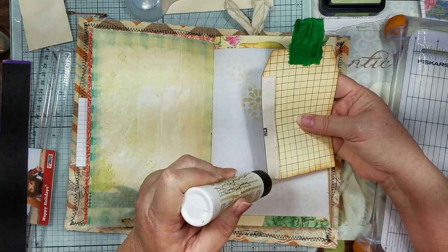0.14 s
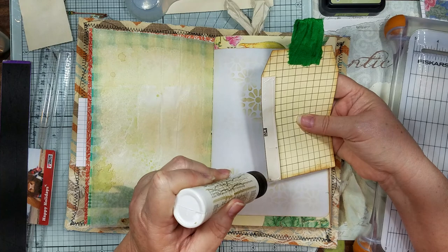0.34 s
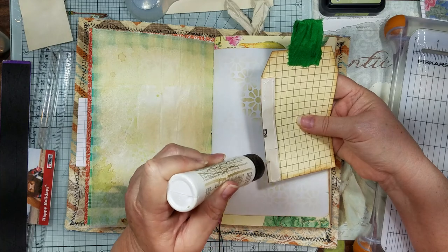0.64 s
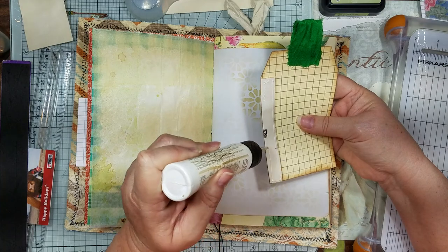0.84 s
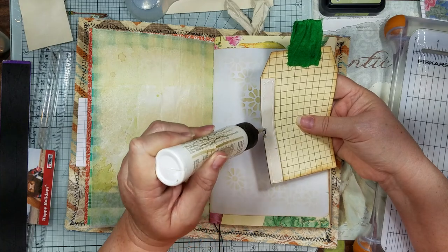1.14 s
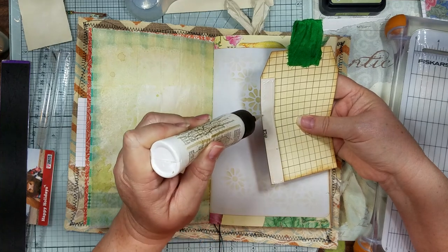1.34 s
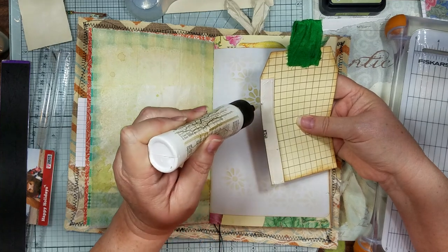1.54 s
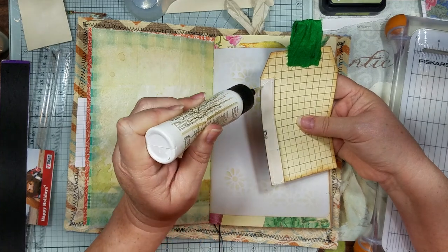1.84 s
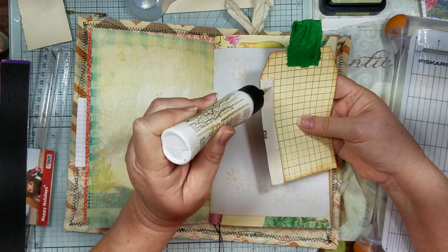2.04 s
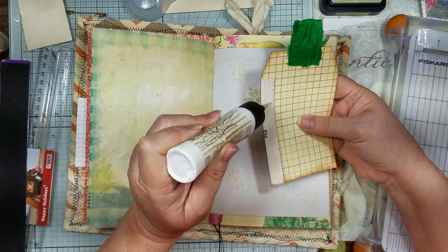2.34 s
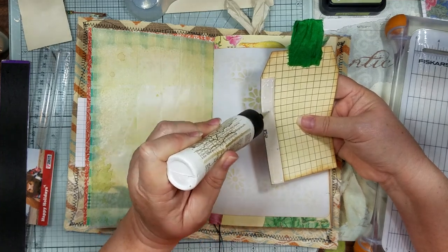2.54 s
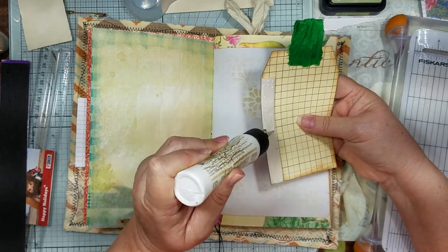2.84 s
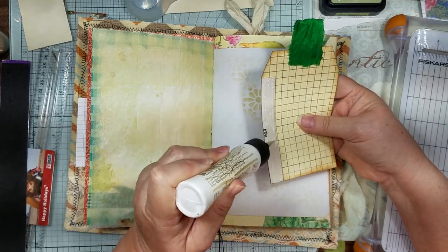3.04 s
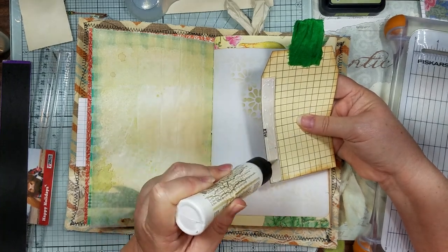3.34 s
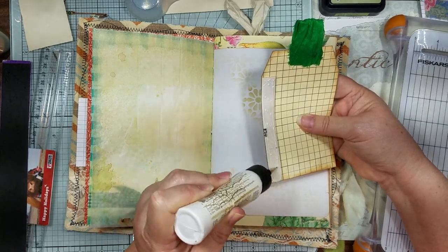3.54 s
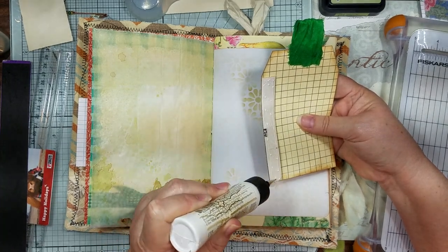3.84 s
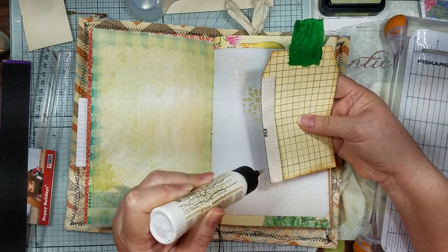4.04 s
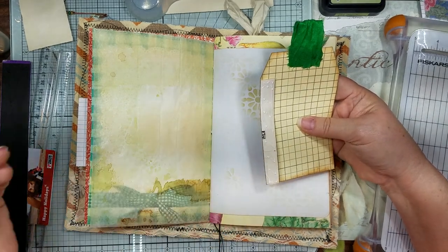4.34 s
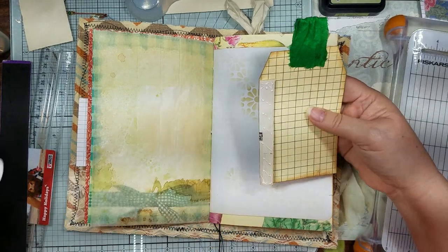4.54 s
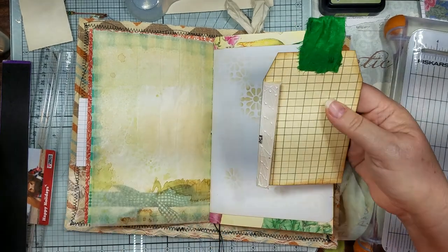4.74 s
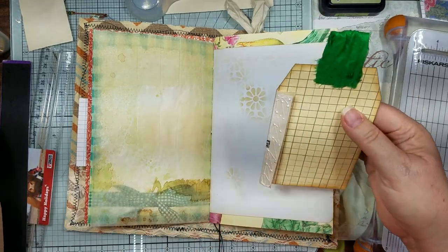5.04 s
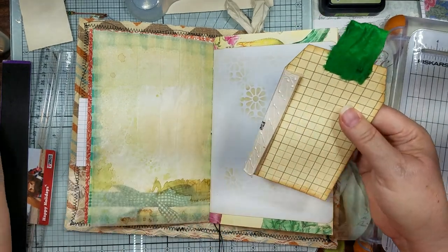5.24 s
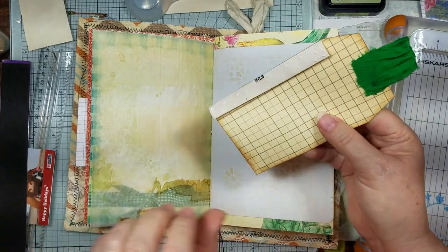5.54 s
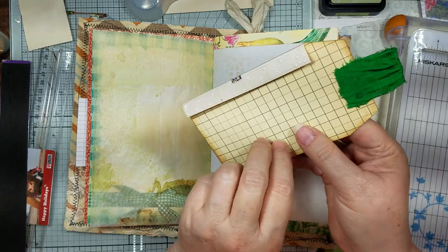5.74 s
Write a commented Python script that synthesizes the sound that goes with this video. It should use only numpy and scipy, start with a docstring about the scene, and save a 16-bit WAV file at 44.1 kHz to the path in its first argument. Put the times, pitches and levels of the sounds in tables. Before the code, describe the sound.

A low, slightly wavering room drone runs throughout. After a soft paper rustle and a nearly inaudible skim, a glue nozzle ticks grainily along a tag's edge for two seconds, slightly right of centre. Then comes louder handling: bottle set down on the table, soft book bump, crisp card snap, dry sliding and small nail clicks. Close pair of microphones, short room tail.

```python
"""A fan hums in a small room: coloured noise, narrow room resonances, wavering sine lines and a brief swell.
The card whispers and is brushed, then a glue bottle's nozzle skims a paper tag and dabs down its edge:
bands of grainy noise. Skin and card rub and slide, a fingernail ticks, the bottle lands and a hand bumps
the book (decaying modes), and the stiff tag snaps on the page (a spike and crackle through resonances).
Two closely spaced microphones hear it all, with a short diffuse room tail and their own faint noise."""
import sys
import numpy as np
from scipy import signal
from scipy.fft import rfft, irfft, next_fast_len
from scipy.io import wavfile
from scipy.ndimage import uniform_filter1d, map_coordinates

SR = 44100
rng = np.random.default_rng(int(sys.argv[2]) if len(sys.argv) > 2 else 0)


def digitize_waveform(pressure):
    """Quantize a signal to 16-bit integers and store it at the path in sys.argv[1].

    Rows of a 2-D input are taken as channels; values are limited to [-1, 1].
    """
    field = np.atleast_2d(pressure).T
    bounded = np.clip(field, -1, 1)
    quanta = np.round(bounded * 32767).astype(np.int16)
    wavfile.write(sys.argv[1], SR, quanta)


N = 260013
TIME = np.arange(N) / SR


def amp(db):
    """Decibels to gain."""
    return 10 ** (np.asarray(db) / 20)


def unit(x):
    """Scale to rms 1."""
    return x / np.sqrt(np.mean(x ** 2) + 1e-20)


def along(points, hz):
    """Read (Hz, value) points on a log frequency axis."""
    f, v = np.transpose(points)
    return np.interp(np.log(hz + 1), np.log(f + 1), v)


def fade(t, t60):
    """Exponential decay that starts at t = 0 and falls 60 dB in t60 seconds."""
    return (t >= 0) * np.exp(-np.log(1000) * np.abs(t) / t60)


def wobble(rate):
    """A smooth random curve, rate knots a second."""
    knots = rng.standard_normal(int(N * rate / SR) + 4)
    return map_coordinates(knots, [TIME * rate])


def filtered(x, response):
    """Filter x by a complex response of frequency."""
    m = next_fast_len(N + SR // 2)
    return irfft(rfft(x, m) * response(np.fft.rfftfreq(m, 1 / SR)), m)[..., :N]


def coloured(x, spectrum):
    """x shaped by a (Hz, dB) spectrum, at rms 1."""
    return unit(filtered(x, lambda hz: amp(along(spectrum, hz))))


def resonance(f, hz, width):
    """Response of one damped resonance, with gain 1 at its peak."""
    return 1j * f * width / (hz * hz - f * f + 1j * f * width)


def placed(x, lead_ms, right_db):
    """A source off to the right reaches that microphone sooner and louder."""
    side = np.array([[-.5], [.5]])
    advance = lambda hz: np.exp(2j * np.pi * hz * side * lead_ms / 10 ** 3)
    return amp(side * right_db) * filtered(x, advance)


def diffuse(x):
    """Sound from all around is alike at both microphones in the bass and unrelated in the treble."""
    spacing_m, sound_speed = 0.18, 343  # m, m/s
    alike = lambda hz: np.sinc(2 * hz * spacing_m / sound_speed)
    split = lambda hz: np.sqrt(np.array([1 + alike(hz), 1 - alike(hz)]) / 2)
    mid, side = filtered(x, split)
    return np.array([mid + side, mid - side])


def room(x):
    """The small room's tail, which dies fastest in the treble."""
    # decay of the room: (f/Hz, t60/s)
    room_decay = [(150, 0.2), (1000, 0.12), (5000, 0.11), (14000, 0.052)]
    hz, t, z = signal.stft(rng.standard_normal((2, SR // 2)), SR, nperseg=256)
    decaying = z * fade(t, along(room_decay, hz)[:, None])
    tail = signal.istft(decaying, SR, nperseg=256)[1]
    tail = np.pad(tail, ((0, 0), (SR // 250, 0)))  # the tail waits 4 ms
    tail = tail / np.linalg.norm(tail[0])
    return diffuse(signal.fftconvolve(x, tail, axes=1)[:, :N])


def room_hum():
    """A fan drones through room resonances with wavering lines and one swell, over air and microphone noise."""
    # broad colour of the drone: (f/Hz, level/dB)
    drone_spectrum = [(15, -21), (40, -27), (62, -5), (82, -10.5), (100, -3.5), (128, 2), (144, -6.5),
                      (168, -0.5), (190, -4.5), (208, -21), (250, -6.5), (300, -18), (420, -26.5),
                      (1500, -61.5)]
    # narrow room resonances in the hum: (f/Hz, width/Hz, level/dB)
    room_peaks = [(404, 32, 0.5), (490, 75, 6.5), (610.6, 22, 8), (737, 13, -9), (840, 45, -11.5),
                  (940, 32, -2.5)]
    # wavering lines of the hum: (f/Hz, mean level/dB)
    tones = [(59.5, -69.5), (118.6, -62), (167, -61.5), (244, -66), (667.5, -79.5)]
    # colour of the air noise: (f/Hz, level/dB)
    air_spectrum = [(30, -5), (200, -4), (500, -3.5), (800, -2), (1300, -4.5), (2200, -9), (3300, -12),
                    (5000, -20.5), (7400, -25.5), (9000, -24), (12000, -20.5), (15500, -18)]
    # colour of the microphones' own low noise: (f/Hz, level/dB)
    self_noise_spectrum = [(15, -4), (40, -9), (120, -5), (250, -5), (500, -13.5), (1000, -53)]
    swell_s, swell_width_s, swell_db, swell_hz = .74, 0.033, -41.5, 172.3

    drone = amp(-51.5) * coloured(rng.standard_normal(N), drone_spectrum)
    peak_response = lambda f: sum(amp(db) * np.abs(resonance(f, hz, width)) ** 2
                                  for hz, width, db in room_peaks)
    drone += amp(-69.5) * unit(filtered(rng.standard_normal(N), peak_response))
    for hz, db in tones:
        level = amp(db + 0.97 * wobble(2.66)) * np.sqrt(2)  # tone levels are rms
        drone += level * np.sin(2 * np.pi * hz * TIME + 0.67 * wobble(5.2))
    swell = np.exp(-((TIME - swell_s) / swell_width_s) ** 2)
    drone += amp(swell_db) * swell * np.sin(2 * np.pi * swell_hz * TIME)
    air = amp(-61.5) * coloured(diffuse(rng.standard_normal((2, N))), air_spectrum)
    # each microphone adds its own faint low noise
    self_noise = amp(-69.5) * coloured(rng.standard_normal((2, N)), self_noise_spectrum)
    return placed(drone, lead_ms=.25, right_db=1.0) + air + self_noise


def add(sound, s, length, db, response, grain_db, rise):
    """Add one stroke of friction around time s; its colour climbs by the share rise as it goes."""
    size = 32768
    t = (np.arange(size) - size // 2) / SR
    f = np.fft.rfftfreq(size, 1 / SR)
    # the fibres catch unevenly, so the noise is grainy
    catches = amp(grain_db * unit(uniform_filter1d(rng.standard_normal(size), size=64)))
    grains = rfft(rng.standard_normal(size) * catches)
    early, late = [unit(irfft(grains * response(f, 1 + way * rise / 2))) for way in (-1, 1)]
    progress = np.clip(.5 + t / length, 0, 1)
    envelope = np.exp(-np.abs(t / (0.65 * length)) ** 2.84)
    stroke = amp(db) * envelope * ((1 - progress) * early + progress * late)
    index = round(s * SR) + np.arange(size) - size // 2
    inside = (index >= 0) & (index < N)
    sound[index[inside]] += stroke[inside]


def glides():
    """Smooth paper on paper gives a thin, narrow whisper."""
    # the sheets glide, levels ahead of the room mix: (middle t/s, length/s, level/dB, f/Hz, width/Hz)
    glide_rows = [(0.165, 0.14, -69.5, 9300, 1700), (4.514, 0.1, -69.5, 4240, 500)]
    sound = np.zeros(N)
    for s, length, db, hz, width in glide_rows:
        whisper = lambda f, shift: resonance(f, shift * hz, width) ** 2
        add(sound, s, length, db, whisper, grain_db=3, rise=-0.014)
    direct = placed(sound, lead_ms=0.012, right_db=5)
    return direct + amp(-4) * room(direct)


def scratches(rows, grain_db, lead_ms, right_db, rise):
    """The card rasps and its fibres hiss, each at a pitch that depends on where it is touched."""
    # fixed colour of the rasp, under its moving resonance: (f/Hz, level/dB)
    rasp_spectrum = [(200, -8), (600, 2.5), (1200, -1), (1900, 1.5), (2700, -8.5), (4500, -10), (7000, -50),
                     (16000, -50)]
    # fixed colour of the hiss, under its moving resonance: (f/Hz, level/dB)
    hiss_spectrum = [(1500, -18), (4100, -5), (5000, -3), (6000, -3.5), (6700, 2), (7600, -3), (8600, 3.5),
                     (9700, -1), (11000, 0), (13000, 2.5), (15800, -3)]
    sound = np.zeros(N)
    for s, length, rasp_db, rasp_hz, hiss_db, hiss_hz in rows:
        rasp_peak = lambda f, shift: resonance(f, shift * rasp_hz, 0.27 * rasp_hz)
        hiss_peak = lambda f, shift: resonance(f, shift * hiss_hz, 0.14 * hiss_hz)
        rasp = lambda f, shift: amp(along(rasp_spectrum, f)) * (0.2 + rasp_peak(f, shift))
        hiss = lambda f, shift: amp(along(hiss_spectrum, f)) * (0.79 + hiss_peak(f, shift))
        add(sound, s, length, rasp_db, rasp, grain_db, rise)
        add(sound, s, length, hiss_db, hiss, grain_db, rise=0.031)
    direct = placed(sound, lead_ms, right_db)
    return amp(2.5) * direct + amp(-2.5) * room(direct)


def card_brushes():
    """Brushes are coarser than the nozzle's strokes and all have the same dull hiss."""
    # brief brushes of the card, levels ahead of the room mix: (middle t/s, length/s, rasp level/dB, rasp f/Hz)
    brush_rows = [(.19, 0.15, -64.5, 1030), (0.358, .04, -64.5, 810), (4.41, 0.02, -57, 1360),
                  (4.851, .012, -55, 1260), (5.245, 0.025, -58, 1140)]
    hiss_over_rasp_db, hiss_hz = -8.5, 4700
    rows = [(s, length, db, hz, db + hiss_over_rasp_db, hiss_hz) for s, length, db, hz in brush_rows]
    return scratches(rows, grain_db=5.5, lead_ms=0.06, right_db=1.5, rise=-0.095)


def friction(spectrum, grain_db):
    """Paper fibres catch and slip: noise whose level flickers finely, then coloured."""
    grains = rng.standard_normal(N) * amp(grain_db * wobble(700))
    return coloured(grains, spectrum)


def pushes(rows, sag_db_per_s):
    """Level of sliding moves: each starts quickly, sags as it slows, and dies when it stops."""
    attack_s, release_t60_s = 0.018, 0.094
    power = np.zeros(N)
    for s, length, db in rows:
        t = np.maximum(TIME - s, 0)
        attack = np.minimum(t / attack_s, 1)
        release = fade(np.maximum(t - length, 0), release_t60_s)
        power += (amp(db - sag_db_per_s * t) * attack * release) ** 2
    return np.sqrt(power)


def sliding():
    """The nozzle skims unevenly; later skin rubs the card, the bottle's base scuffs and the card slides."""
    # skin rubs on the card, and the bottle's base scuffs as it lands (4.455 s);
    # levels ahead of the room mix: (start t/s, length/s, level/dB)
    rub_rows = [(4.39, 0.57, -67.5), (4.455, 0.05, -62), (5.08, 0.034, -64), (5.21, 0.05, -63),
                (5.43, .47, -65.5), (5.8, .1, -65.5)]
    # the card is pushed over the page, levels ahead of the room mix: (start t/s, length/s, level/dB)
    swish_rows = [(4.43, 0.46, -64), (4.83, 0.083, -66), (5.08, 0.032, -67), (5.23, 0.18, -66.5),
                  (5.752, 0.021, -56), (5.8, .1, -65.5)]
    # colour of the rubs and the scuff: (f/Hz, level/dB)
    rub_spectrum = [(150, 10), (450, 4.5), (800, -1), (1120, 8), (1450, -1.5), (1800, 5), (2700, -4.5),
                    (3250, -1), (4100, -20), (5200, -12), (8000, -51), (16000, -52)]
    # bright colour of the skim and of card on page: (f/Hz, level/dB)
    sheen_spectrum = [(2000, -18), (4200, -1.5), (5500, -0.5), (7300, -4.5), (9000, 4.5), (10500, 3.5),
                      (12500, 8), (15800, 4.5)]

    # the nozzle barely touches: (start t/s, length/s, level/dB)
    skim = pushes([(0.54, 1.17, -81)], sag_db_per_s=0)
    skim = skim * amp(2 * wobble(7.2))  # pressure: depth in dB, changes a second
    rub = pushes(rub_rows, sag_db_per_s=0.5)
    rub = rub * amp(1.5 * wobble(14))  # pressure wavers
    rub = rub * friction(rub_spectrum, grain_db=2)
    swish = pushes(swish_rows, sag_db_per_s=40)
    hiss = (swish + skim) * friction(sheen_spectrum, grain_db=2)
    direct = placed(rub + hiss, lead_ms=0.017, right_db=2.5)
    return amp(2) * direct + amp(-2) * room(direct)


def nozzle_strokes():
    """Each stroke takes its colour from its speed and from the place on the edge that the nozzle has reached."""
    # strokes, about eight a second, levels ahead of the room mix: (middle t/s, length/s, rasp level/dB)
    stroke_rows = [(1.991, 0.028, -77), (2.137, 0.036, -64.5), (2.274, .048, -66), (2.374, 0.036, -58.5),
                   (2.516, 0.046, -64), (2.634, 0.049, -63), (2.756, 0.075, -64), (2.877, .058, -66),
                   (3.001, 0.066, -64.5), (3.126, 0.035, -64), (3.277, 0.055, -67), (3.398, .042, -67),
                   (3.524, .055, -65), (3.632, 0.038, -69.5), (3.757, .057, -73), (3.978, 0.014, -70.5)]
    # the paper's answer along its edge: (t/s, hiss over rasp level/dB, hiss f/Hz)
    edge_rows = [(2.0, -10, 10000), (2.27, -4, 10600), (2.37, -11, 11500), (2.63, -12, 11600),
                 (2.76, -3, 10800), (3.1, 0, 10600), (3.28, 2, 8700), (3.52, -1.5, 9150),
                 (3.65, -.5, 11200)]
    start_hz, sag_hz_per_s = 1610, 150  # rasp pitch of a stroke of usual length
    usual_stroke_s, speed_power = .045, 0.4
    s, length, db = np.transpose(stroke_rows)
    edge_s, over_db, edge_hz = np.transpose(edge_rows)
    # the rasp drops as the nozzle nears the free corner; a quicker stroke rasps higher
    place_hz = start_hz - sag_hz_per_s * (s - s[0])
    rasp_hz = place_hz * (usual_stroke_s / length) ** speed_power
    hiss_db = db + np.interp(s, edge_s, over_db)
    hiss_hz = np.interp(s, edge_s, edge_hz)
    rows = zip(s, length, db, rasp_hz, hiss_db, hiss_hz)
    return scratches(rows, grain_db=3.5, lead_ms=0.016, right_db=4.5, rise=0.29)


def clicks(rows, body, room_db):
    """A sharp snap and a short crackle pass through the resonances of what is struck."""
    snaps = np.zeros((2, N))
    for s, db, t60, lead_ms in rows:
        snap = fade(TIME - s, t60) * rng.standard_normal(N)
        snap[round(s * SR)] -= 5.5
        snaps += placed(amp(db) * snap, lead_ms, right_db=0.5)
    response = lambda f: sum(amp(db) * resonance(f, hz, width) for hz, width, db in body)
    direct = amp(2.5) * filtered(snaps, response)
    return direct + amp(room_db) * room(direct)


def nail_ticks():
    """Fingernails tick on the tag, each tick ringing broad, damped resonances."""
    # ticks, levels ahead of the resonances: (t/s, level/dB, crackle t60/s, right lead/ms)
    tick_rows = [(4.402, -51.5, 0.063, 0.027), (5.7686, -42.5, 0.0036, .02), (5.7697, -49, 0.014, .02),
                 (5.8001, -36, 0.0046, 0.023)]
    # resonances of nail on tag: (f/Hz, width/Hz, level/dB)
    nail_body = [(433, 320, 9.5), (1180, 370, 9.5), (1840, 350, 4.5), (2520, 330, -15), (3760, 940, -2),
                 (5530, 1900, -20), (13500, 13000, -1.5)]
    return clicks(tick_rows, nail_body, room_db=-10.5)


def knocks(blows, modes, low_hz, room_db):
    """A blow starts all modes together; a longer contact favours the low ones."""
    sound = np.zeros(N + SR)
    t = np.arange(SR // 3) / SR
    for s, db, contact in blows:
        ring = np.zeros(len(t))
        for hz, level, t60 in modes:
            strength = amp(level) / (1 + (hz * contact) ** 2)
            ring += strength * np.sin(2 * np.pi * hz * t) * fade(t, t60)
        onset = 1 - np.exp(-(t / contact) ** 2)
        sound[round(s * SR):][:len(t)] += amp(db) * ring * onset
    # a small surface radiates little deep bass
    highpass = signal.butter(3, low_hz, "highpass", fs=SR, output="sos")
    radiated = signal.sosfilt(highpass, sound[:N])
    direct = placed(radiated, lead_ms=0.23, right_db=1.5)
    return direct + amp(room_db) * room(direct)


def bottle_set_down():
    """The bottle's base lands and rocks, ringing the modes of the table under it."""
    # landings, levels ahead of the modes: (t/s, level/dB, contact time/s)
    landings = [(4.4614, -19, 0.00039), (4.4705, -33, 0.00052), (4.4830, -29, 0.00098)]
    # modes of the table: (f/Hz, level/dB, t60/s)
    table_modes = [(186, -19, 0.33), (222.5, -5, 0.07), (267, 0, 0.025), (303, -5, 0.048),
                   (441, -7.5, 0.05), (540, -0.5, 0.025), (611, -3, 0.052), (660, -33, 0.045),
                   (844, -15.5, 0.077), (1010, -15, 0.042), (1200, -5, 0.021), (1400, -31, 0.057),
                   (1690, -19, .05), (1860, -28, .04), (2250, -34, 0.027)]
    return knocks(landings, table_modes, low_hz=147, room_db=-10.0)


def hand_bumps():
    """A hand bumps the open book, which thuds in its own modes."""
    # bumps, levels ahead of the modes: (t/s, level/dB, contact time/s)
    bump_rows = [(4.8468, -27.5, 0.00021), (4.8765, -48, 0.0018)]
    # modes of the book: (f/Hz, level/dB, t60/s)
    book_modes = [(116, -11, 0.11), (145.6, -1, 0.086), (166.3, -6, 0.13), (397, -13, 0.12),
                  (514, -12, 0.028), (830, -11.5, 0.031), (1193, -15.5, 0.047), (1570, -17, .03)]
    return knocks(bump_rows, book_modes, low_hz=86, room_db=-10.0)


def tag_snaps():
    """The stiff tag snaps against the page, exciting the resonances of the card."""
    # snaps, levels ahead of the resonances: (t/s, level/dB, crackle t60/s, right lead/ms)
    snap_rows = [(5.0801, -30.5, 0.0082, 0.068), (5.0810, -35, 0.016, 0.025), (5.0845, -35, 0.013, 0.09)]
    # resonances of the card: (f/Hz, width/Hz, level/dB)
    card_body = [(314, 250, 5.5), (1194, 91, 6), (1360, 140, 4.5), (1560, 130, 2), (2300, 430, -1.5),
                 (3650, 560, -5), (4840, 230, -7), (13500, 16400, -10)]
    return clicks(snap_rows, card_body, room_db=-10.0)


def scene():
    """Everything on the table, in the humming room."""
    paper = glides() + card_brushes() + sliding() + nozzle_strokes()
    handling = nail_ticks() + bottle_set_down() + hand_bumps() + tag_snaps()
    return room_hum() + paper + handling


def record(dry):
    """Keep nothing above the band limit of 15950 Hz."""
    return filtered(dry, lambda hz: hz < 15950)


dry = scene()
out = record(dry)
digitize_waveform(out)
```